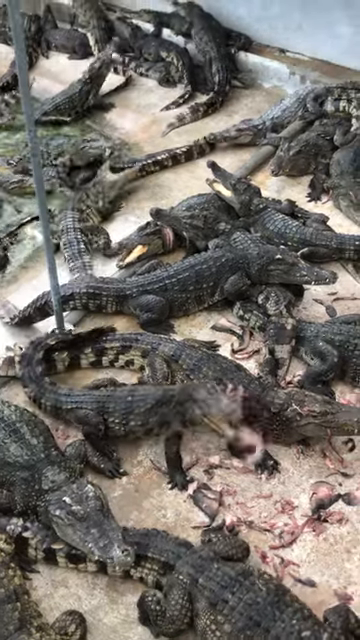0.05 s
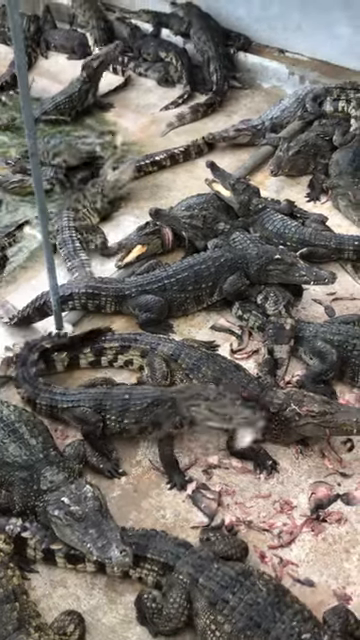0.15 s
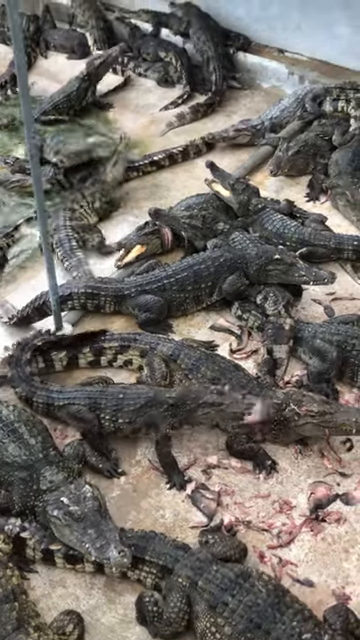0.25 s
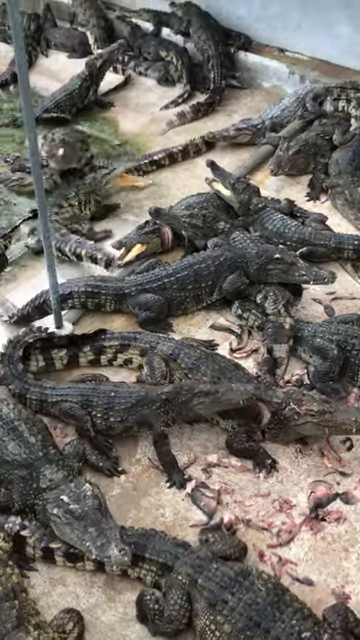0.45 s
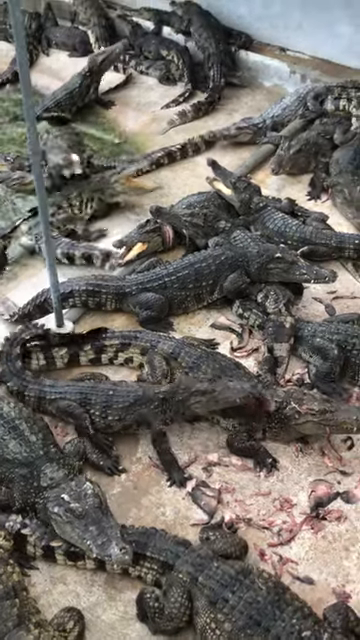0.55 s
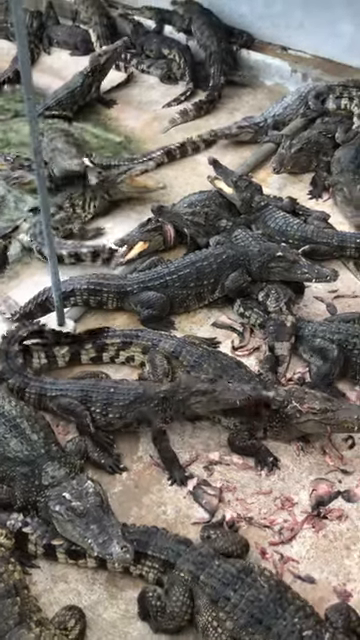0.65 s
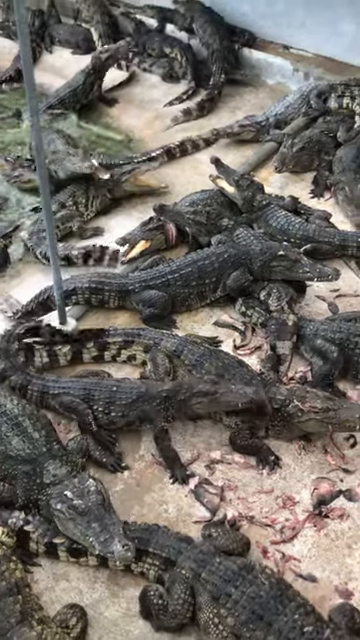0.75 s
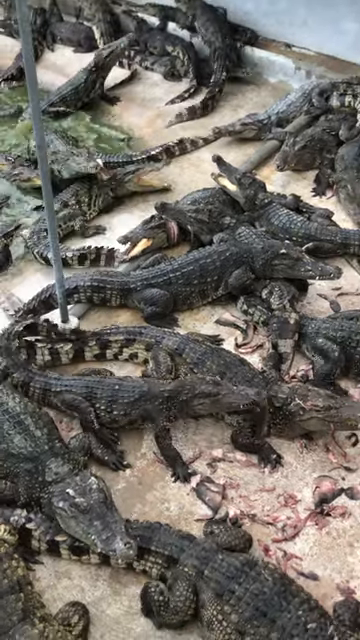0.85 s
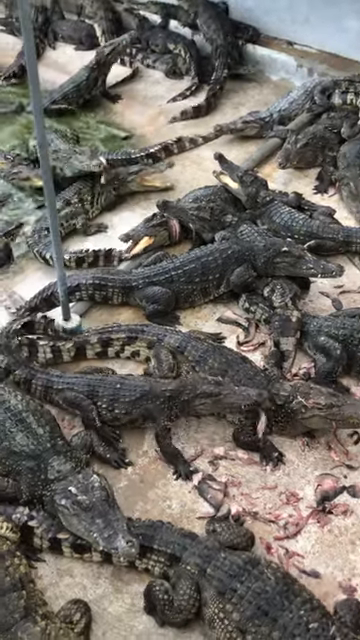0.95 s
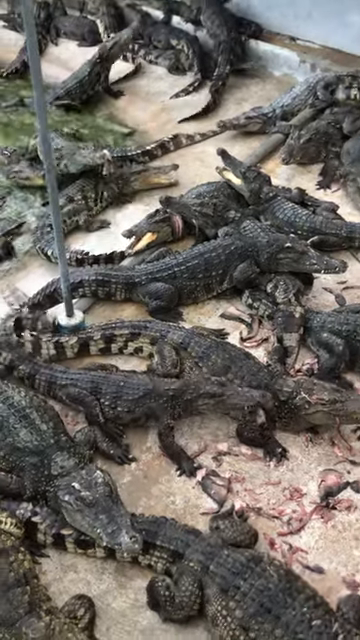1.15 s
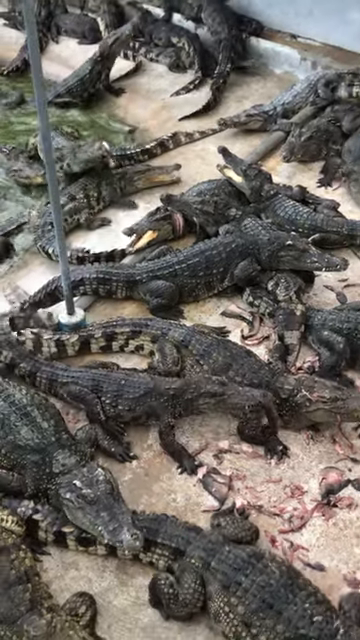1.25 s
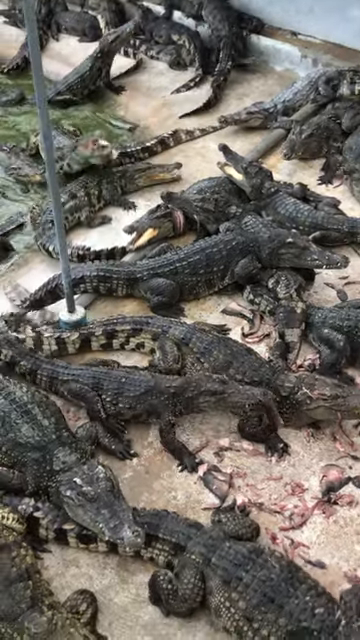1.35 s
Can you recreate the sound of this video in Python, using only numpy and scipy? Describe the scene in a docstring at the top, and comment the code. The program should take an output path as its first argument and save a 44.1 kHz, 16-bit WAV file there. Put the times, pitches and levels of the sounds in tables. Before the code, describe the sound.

A crocodile claps its jaws shut close to the microphone, a wet crack and hollow thump echoing briefly in a concrete pen. Faint mouth smacks, claw taps and tiny squeaks follow over steady outdoor hiss.

```python
"""A crowded concrete crocodile pen, outdoors. Near the microphone one animal claps its jaws shut:
a wet crack, then the hollow thump of skull and throat, which the walls throw back.
Around it wet mouths smack, claws tap and scaly hides squeak and crackle on the floor.
Behind them lies a steady open-air hiss, with faint whistles far off."""
import sys
import numpy as np
from scipy import signal
from scipy.fft import rfft, irfft, next_fast_len
from scipy.io import wavfile
from scipy.ndimage import uniform_filter1d

SR = 44100
rng = np.random.default_rng(int(sys.argv[2]) if len(sys.argv) > 2 else 0)


def inscribe(sig):
    """Save sig as 16-bit PCM at rate SR to the path in sys.argv[1].

    A 1-D sig is mono; a 2-D sig holds one channel per row.
    Samples are clipped to [-1, 1] before scaling.
    """
    pcm = np.round(np.clip(np.atleast_2d(sig).T, -1, 1) * 32767)
    wavfile.write(sys.argv[1], SR, pcm.astype(np.int16))


N = 61739


def amp(db):
    """Decibels to gain."""
    return 10 ** (np.asarray(db) / 20)


def unit(x):
    """Scales to rms 1."""
    return x / np.sqrt(np.mean(x ** 2) + 1e-20)


def level_at(spectrum, hz):
    """Reads the level in dB between rows of (Hz, dB), on a log-frequency axis."""
    row_hz, row_db = np.transpose(spectrum)
    return np.interp(np.log(hz + 1), np.log(row_hz + 1), row_db)


def since(start):
    """Seconds since a moment, zero before it."""
    return np.maximum(np.arange(N) / SR - start, 0)


def noise(gain):
    """Noise of rms 1, shaped by the function gain(Hz)."""
    size = next_fast_len(N)
    white = rfft(rng.standard_normal(size))
    return unit(irfft(white * gain(np.fft.rfftfreq(size, 1 / SR)), size)[:N])


def coloured_noise(spectrum):
    """Noise of rms 1, shaped by rows of (Hz, dB)."""
    return noise(lambda f: amp(level_at(spectrum, f)))


def wobble(corner_hz):
    """Random motion of rms 1, mostly slower than the corner."""
    return noise(lambda f: 1 / (1 + (f / corner_hz) ** 2))


def fade(t, t60):
    """Exponential decay, 60 dB down after t60 seconds."""
    return np.exp(-np.log(1000) * t / t60)


def burst(at, rise, t60):
    """An envelope that swells up to a moment and dies away."""
    return np.exp(np.minimum(np.arange(N) / SR - at, 0) / rise) * fade(since(at), t60)


def air():
    """Open-air hiss behind the pen, with drifting patches and slowly changing bass, middle and treble."""
    # Colour of the hiss. Each row: frequency in Hz, relative level in dB.
    spectrum = [(25, -26), (50, 8.5), (90, -1.5), (170, 0.5), (280, 0), (390, -6), (600, 0), (800, -2.5),
                (1350, -2.5), (1750, -3.5), (2200, -2.5), (3600, -5), (5200, -6.5), (6800, -15.5),
                (13500, -15.5), (16000, -22.5)]
    # Drift of the hiss. Each row: time in seconds, then bass, middle and treble offsets in dB.
    band_drift = [(0, 1.5, -4, 2), (.17, 0.5, 2, 2.5), (.45, 2.5, -3, 0), (.65, 2.5, -4, -0.5),
                  (0.842, -3, -1.5, -5.5), (0.919, -2.5, -2, 0), (1.15, -8.5, 2, -2), (1.4, -2.5, -3, -5.5)]
    # Centres of bass, middle and treble in Hz.
    bands_hz = [250, 980, 2100]
    hiss_db, patch_db = -49, 3
    hz, t, cells = signal.stft(rng.standard_normal(N), SR, nperseg=1024, noverlap=768)
    patches = uniform_filter1d(rng.standard_normal(cells.shape), size=9, axis=0)
    patches = unit(uniform_filter1d(patches, size=9, axis=1))
    times, *levels = np.transpose(band_drift)
    shares = [np.interp(np.log(hz + 1), np.log(bands_hz), band) for band in np.eye(len(levels))]
    drift_db = sum(np.outer(share, np.interp(t, times, db)) for share, db in zip(shares, levels))
    cells *= amp(level_at(spectrum, hz)[:, None] + patch_db * patches + drift_db)
    hiss = signal.istft(cells, nperseg=1024, noverlap=768)[1][:N]
    return amp(hiss_db) * unit(hiss)


def whistles():
    """Thin, birdlike whistles far off: wavering tones that swell, glide and fade, blurred by distance."""
    # Each row: start in seconds, length in seconds, first and last pitch in Hz, level in dB.
    calls = [(0.012, 0.098, 2170, 2162, -50.5), (0.274, 0.085, 4850, 4810, -54.5),
             (0.309, 0.079, 3470, 4070, -51.5), (0.368, 0.091, 4520, 4880, -49),
             (.322, 0.123, 2120, 2280, -53), (0.485, .11, 4850, 4820, -51.5),
             (0.628, 0.163, 2950, 2914, -54.5), (0.753, 0.1, 2170, 2154, -55),
             (0.864, 0.11, 5000, 5120, -55.5)]
    waver_share, blur_share = 0.015, 0.057  # of the pitch
    tone_db = -14  # against the blur
    out = np.zeros(N)
    for start, length, first_hz, last_hz, db in calls:
        progress = np.minimum(since(start) / length, 1)
        waver = 1 + waver_share * wobble(corner_hz=112)
        pitch_hz = (first_hz + (last_hz - first_hz) * progress) * waver
        phase = 2 * np.pi * np.cumsum(pitch_hz) / SR
        blur_hz = blur_share * first_hz
        blur = wobble(blur_hz) * np.cos(phase) + wobble(blur_hz) * np.sin(phase)
        out += amp(db) * np.sin(np.pi * progress) * (amp(tone_db) * np.sin(phase) + blur)
    return out


def pen_echo(near):
    """What the concrete sends back to the microphone: scattered echoes and a tail longest in the bass."""
    # The pen's reverberation. Each row: band in Hz, t60 in seconds, level in dB.
    tail_bands = [(59, 3.2, -11), (111, 1, -1), (181, 0.93, -10.5), (297, 0.58, -2), (570, 0.49, -8),
                  (1100, 0.49, -13), (2500, 0.53, -12.5), (12000, 0.26, -22)]
    # Echoes off the walls. Each row: delay in seconds, level in dB, low edge in Hz.
    walls = [(0.018, -15, 200), (.055, -16, 290), (0.073, -16, 400), (.092, -20, 100), (.13, -25, 128)]
    build_s, scatter_s = 0.0095, 0.0064
    t, hz = since(0), np.fft.rfftfreq(N, 1 / SR)
    white, response = rfft(rng.standard_normal(N)), np.zeros(N)
    bands_hz = [row[0] for row in tail_bands]
    for band, (_, t60, db) in zip(np.eye(len(tail_bands)), tail_bands):
        share = np.interp(np.log(hz + 1), np.log(bands_hz), band)
        envelope = fade(t, t60) * (1 - np.exp(-(t / build_s) ** 2))
        response += amp(db) * irfft(white * share, N) * envelope / np.linalg.norm(envelope)
    for delay, db, edge_hz in walls:
        scatter = rfft(rng.standard_normal(N) * (t > delay) * np.exp(-since(delay) / scatter_s))
        smear = np.exp(1j * np.angle(scatter))  # spread in time, equally strong at every pitch
        low_cut = hz ** 4 / (hz ** 4 + edge_hz ** 4)
        response += amp(db) * irfft(smear * low_cut, N) * (t < 2 * delay)
    return signal.fftconvolve(near, response)[:N]


def grit():
    """Scales crackle finely on the wet floor as the animals shift."""
    grains_per_s, grit_db, spread_db, corner_hz = 140, -59, 4, 4500
    sizes = amp(spread_db * np.minimum(rng.exponential(1, N), 3))
    grains = sizes * (rng.random(N) < grains_per_s / SR)
    envelope = signal.fftconvolve(grains, fade(since(0), t60=0.008))[:N]
    return amp(grit_db) * unit(envelope * noise(lambda f: f / (1 + (f / corner_hz) ** 2) ** 2))


def squeaks():
    """Wet hide slips on the floor: short gliding tones with a slight flutter."""
    # Each row: peak time in seconds, swell in seconds, pitch in Hz, glide in Hz per second, level in dB.
    slips = [(1.108, 0.0027, 576, -13, -43), (1.112, 0.0011, 3650, -2, -38.5),
             (1.133, 0.006, 2520, -12000, -45), (1.194, .005, 1370, -9000, -45.5),
             (1.214, 0.0024, 2026, 15, -43), (1.257, .009, 1330, -11000, -48.5)]
    out = np.zeros(N)
    for at, swell, hz, glide, db in slips:
        from_peak = since(0) - at
        flutter = 1 + 0.3 * wobble(corner_hz=150)
        cycles = hz * from_peak + glide * from_peak ** 2 / 2
        out += amp(db) * np.exp(-(from_peak / swell) ** 2) * flutter * np.sin(2 * np.pi * cycles)
    return out


def taps():
    """Claws, teeth and feet tap around the pen, each a gritty burst around one resonance."""
    # Each row: peak time in seconds, resonance in Hz, level in dB, t60 in seconds.
    hits = [(0.104, 720, -46.5, .06), (.125, 183, -44.5, 0.11), (0.386, 3550, -41, 0.013),
            (0.526, 750, -49, 0.21), (0.594, 2650, -44.5, 0.021), (0.754, 2570, -44, 0.046),
            (0.769, 1970, -43.5, 0.066), (0.77, 556, -47.5, 0.052), (1.101, 3600, -44, 0.0088),
            (1.122, 2030, -43, .012), (1.122, 3800, -42, 0.011), (1.132, 2810, -46.5, 0.061),
            (1.148, 625, -49, 0.2), (1.213, 3100, -44.5, 0.016), (1.288, 2040, -46.5, .014),
            (1.291, 3360, -41.5, 0.012), (1.343, 2210, -47, 0.03), (1.342, 4370, -44, 0.027),
            (1.342, 625, -54, 0.099)]
    width_share, skirt_db, rise_s = 0.13, -19.5, 0.0022
    out = np.zeros(N)
    for at, hz, db, t60 in hits:
        rasp = noise(lambda f: 1 / (1 + ((f / hz - 1) / width_share) ** 2)
                     + amp(skirt_db) / (1 + (f / hz / 2) ** 2))
        out += amp(db) * burst(at, rise_s, t60) * rasp
    return out


def smacks():
    """Wet mouths smack on meat nearby: short, bright bursts of noise."""
    # Each row: peak time in seconds, level in dB, rise in seconds, t60 in seconds.
    bites = [(0.069, -46.5, 0.0037, 0.025), (0.127, -38.5, 0.00065, 0.011), (0.146, -43, 0.0007, 0.019),
             (.169, -41.5, .001, .01), (0.384, -36, 0.001, 0.029), (0.533, -44.5, 0.002, 0.014),
             (.773, -42.5, 0.0037, 0.022), (.787, -50, 0.0065, 0.093), (0.902, -41.5, .001, 0.015),
             (1.016, -39.5, 0.0036, 0.027), (1.046, -47, 0.012, 0.19), (1.104, -35.5, 0.00088, 0.0096),
             (1.109, -35, 0.00084, 0.0088), (1.337, -52.5, 0.022, 0.048)]
    # Colour of a smack. Each row: frequency in Hz, relative level in dB.
    spectrum = [(400, 1.5), (1500, -6), (4000, 3), (7000, 0.5), (11000, 1.5), (16000, 1)]
    return coloured_noise(spectrum) * sum(amp(db) * burst(at, rise, t60) for at, db, rise, t60 in bites)


def jaw_snap():
    """The jaws meet near the microphone: a crack, a wet fizz, a thud of flesh, a hollow ring."""
    # Modes of jaws, skull and throat; the deep ones swell last.
    # Each row: frequency in Hz, level in dB, t60 in seconds, rise in seconds.
    modes = [(176.7, -10, 0.073, 0.0041), (224.3, -19, 0.11, 0.018), (111.5, -27.5, 0.095, 0.0061),
             (286, -32, 0.029, 0.015), (471, -29, 0.11, 0.0034), (510, -23, 0.075, 0.00073),
             (615, -8.5, 0.023, 0.0029), (780, -29, 0.015, 0.0016), (876, -20.5, 0.029, 0.00092),
             (1077, -24.5, 0.12, 0.0017), (1262, -23.5, 0.027, 0.001), (1684, -15, 0.0048, 0.00069),
             (2550, -16.5, 0.0037, 0.00021), (3400, -16, 0.0015, 0.00046)]
    # Colours of the impact, the wet fizz and the shaking flesh.
    # Each row: frequency in Hz, relative level in dB.
    crack_spectrum = [(300, -10), (1400, 8.5), (3000, -8), (5000, -3), (7000, -21), (11000, -16),
                      (16000, -8)]
    fizz_spectrum = [(500, 11.5), (2000, -1.5), (4000, -2.5), (7000, -5), (11000, -3), (16000, -7)]
    thud_spectrum = [(40, -50), (85, 7.5), (170, -0.5), (300, 0), (400, -3.5), (750, -13), (1000, -6.5),
                     (2000, -27), (4000, -26)]
    snap_s, thud_rise_s = 0.2303, 0.005
    crack_db, fizz_db, thud_db = -24.5, -31.5, -30.5
    t = since(snap_s)
    ring = sum(amp(db) * (1 - np.exp(-(t / rise) ** 2)) * fade(t, t60) * np.sin(2 * np.pi * hz * t)
               for hz, db, t60, rise in modes)
    crack = amp(crack_db) * fade(t, t60=0.0073) * coloured_noise(crack_spectrum)
    fizz = amp(fizz_db) * fade(t, t60=0.16) * coloured_noise(fizz_spectrum)
    thud_swell = 1 - np.exp(-t / thud_rise_s)
    thud = amp(thud_db) * thud_swell * fade(t, t60=0.27) * coloured_noise(thud_spectrum)
    return ring + thud + (crack + fizz) * (t > 0)


def scene():
    """The animals close by, their echo in the pen, and the open air beyond, in mono."""
    near = jaw_snap() + smacks() + taps() + squeaks() + grit()
    return (near + pen_echo(near) + whistles() + air())[None]


def record(dry):
    """The microphone rolls the bass off steeply, then the highest treble is cut."""
    low_cut_hz, high_cut_hz = 60, 16200
    high_pass = signal.butter(N=4, Wn=low_cut_hz, btype="high", fs=SR, output="sos")
    low_pass = signal.firwin(511, high_cut_hz, window=("kaiser", 9), fs=SR)
    return signal.oaconvolve(signal.sosfilt(high_pass, dry), low_pass[None], "same")


dry = scene()
out = record(dry)
inscribe(out)
```